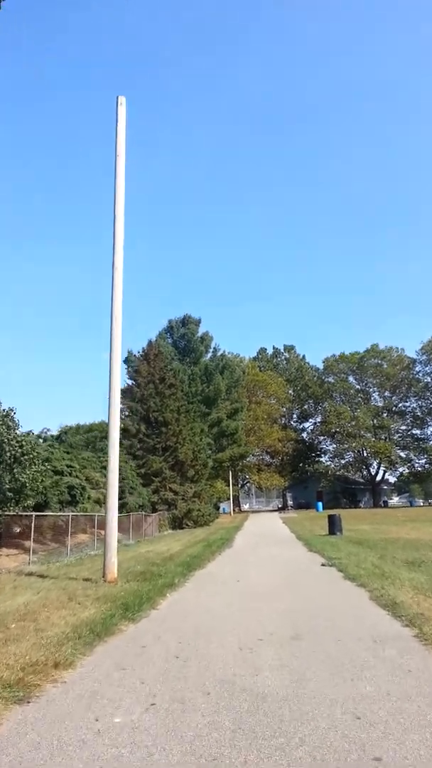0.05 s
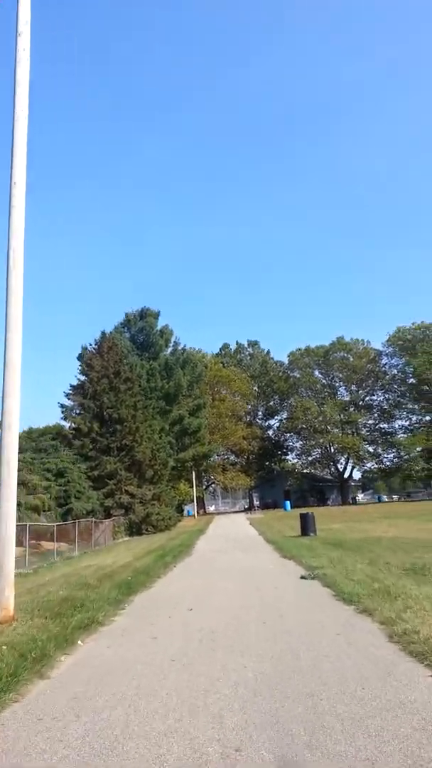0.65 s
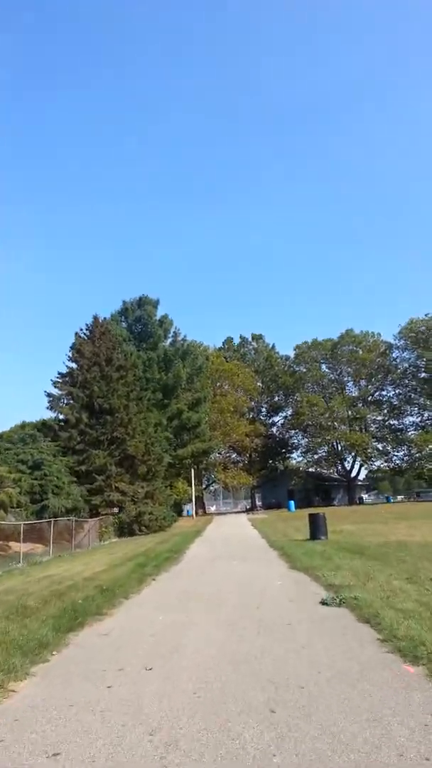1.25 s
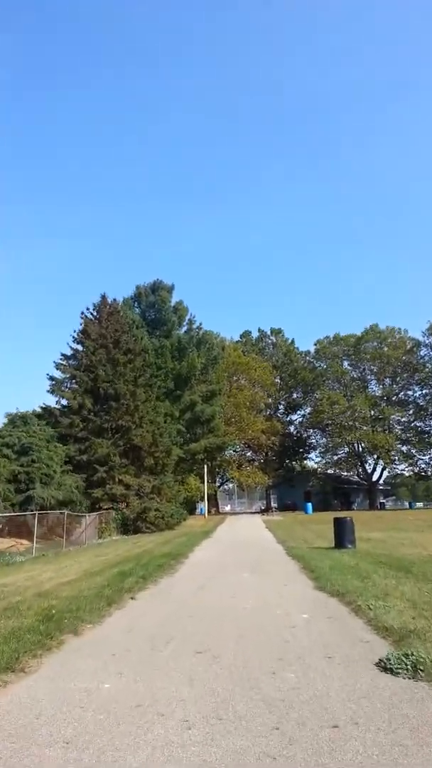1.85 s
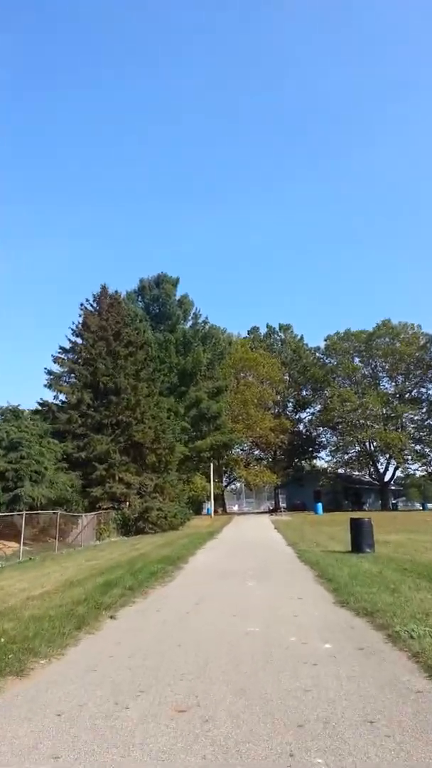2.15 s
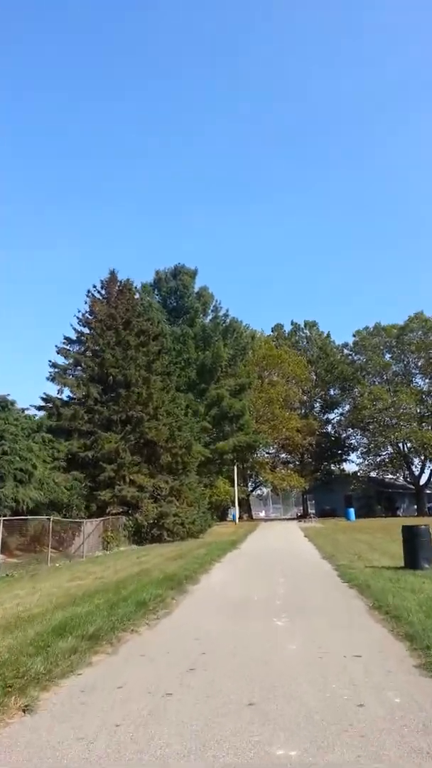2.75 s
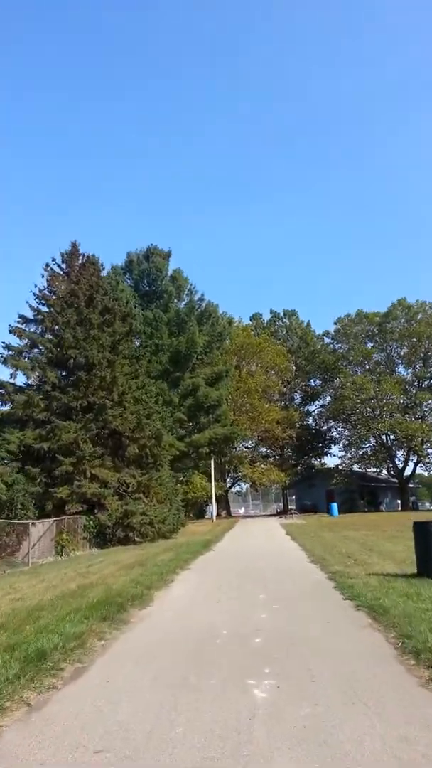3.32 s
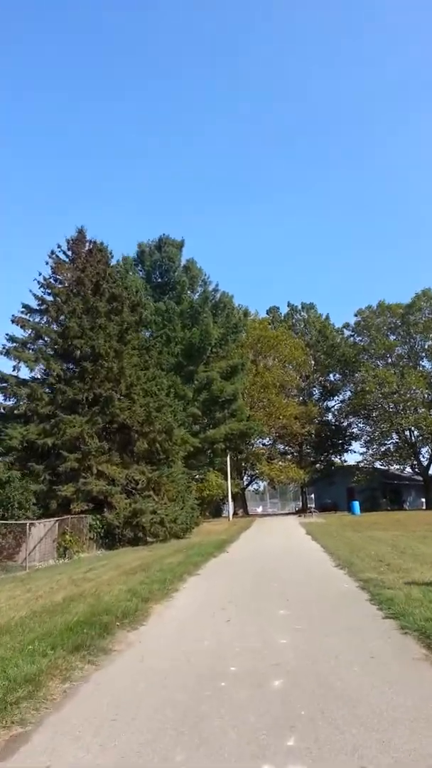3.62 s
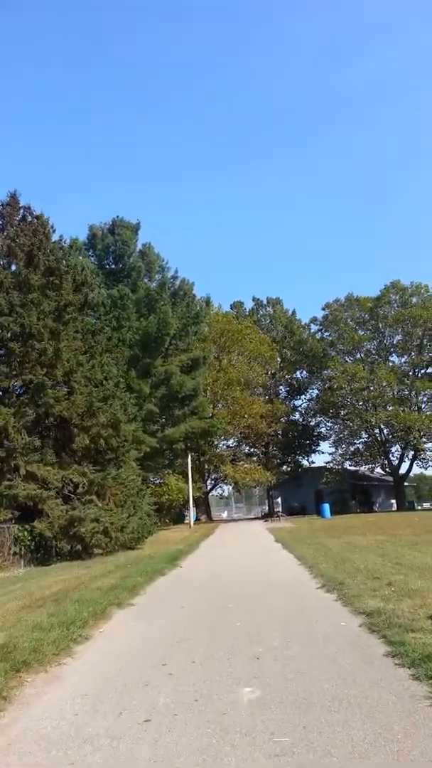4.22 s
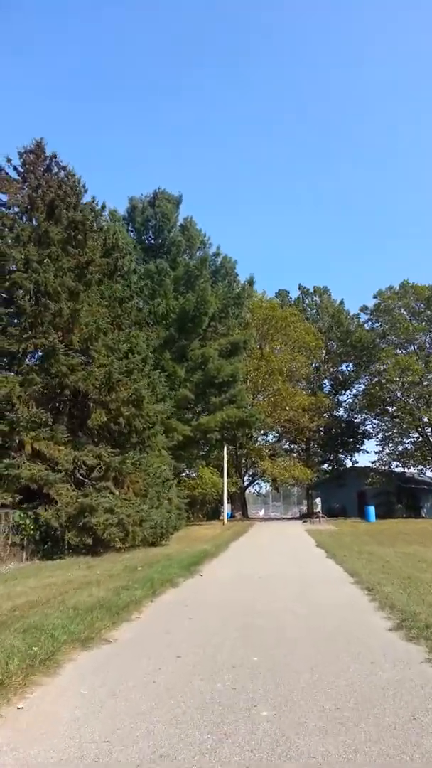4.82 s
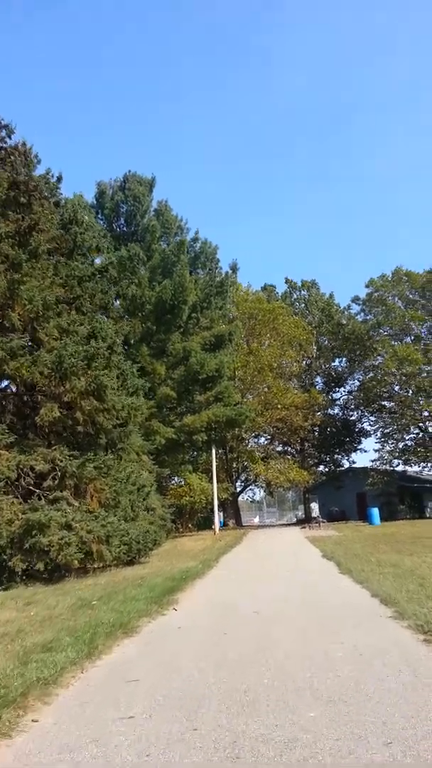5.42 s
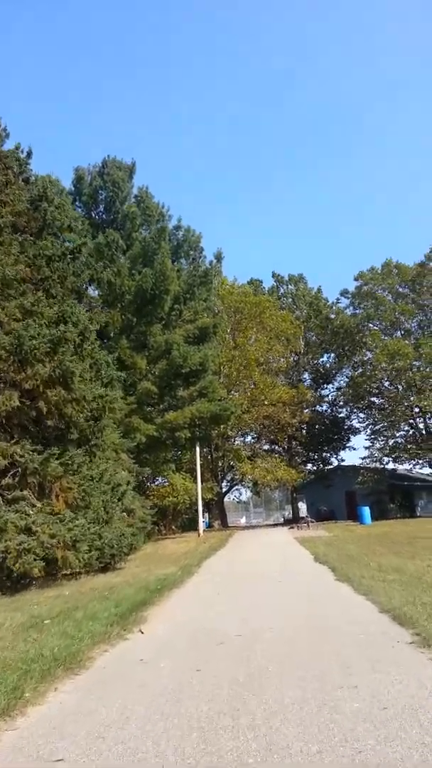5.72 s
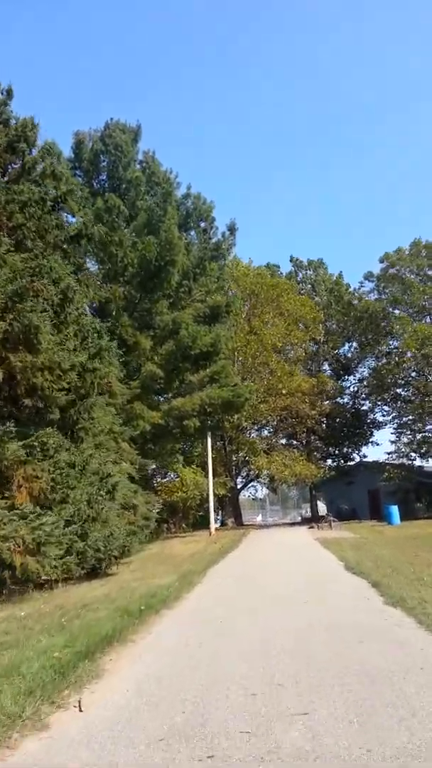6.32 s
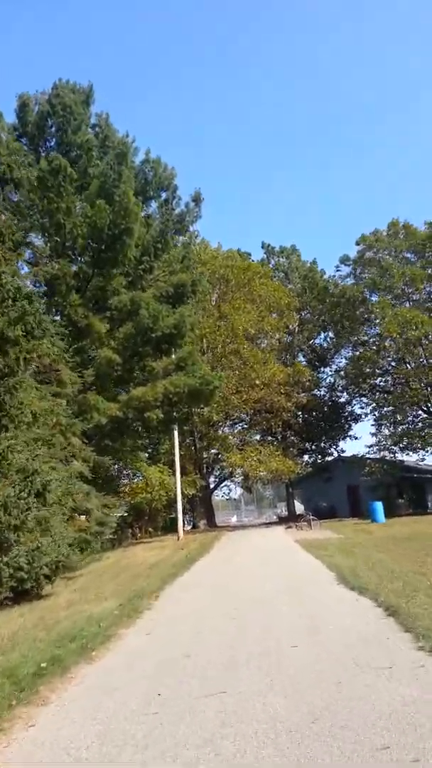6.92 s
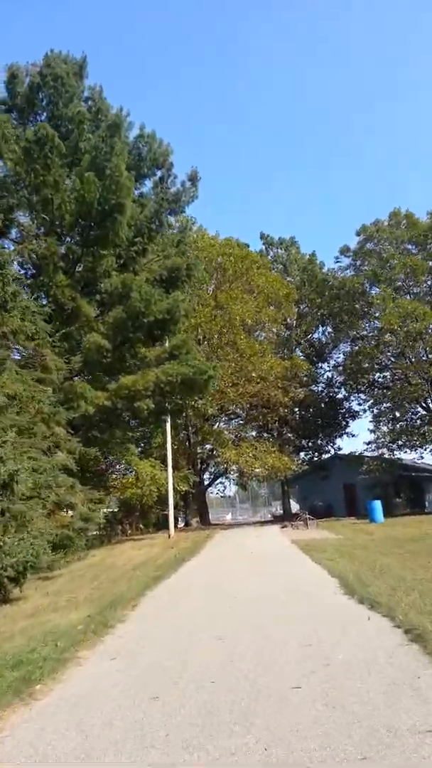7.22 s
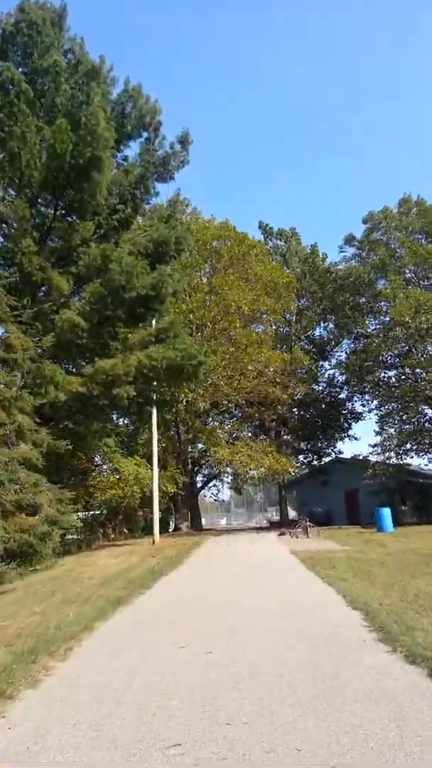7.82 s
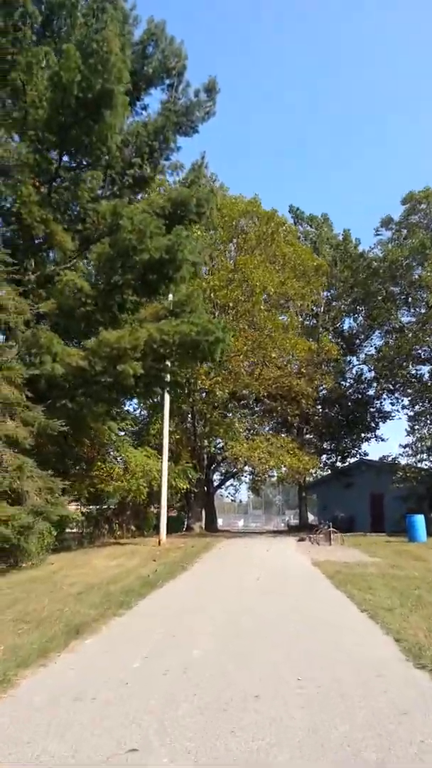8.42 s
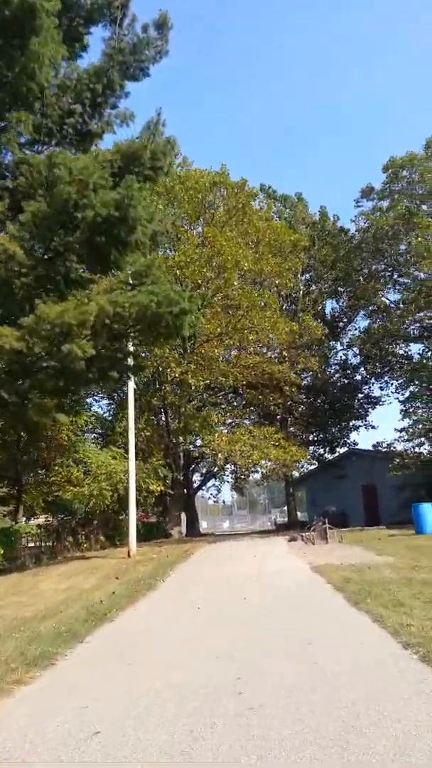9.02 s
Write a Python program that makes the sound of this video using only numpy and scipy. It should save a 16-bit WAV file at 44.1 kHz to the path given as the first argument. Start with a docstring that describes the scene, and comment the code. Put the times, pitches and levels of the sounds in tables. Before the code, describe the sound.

Steady drumming and chatter of a rolling bicycle, with metal ticks, gravel crunches, hard bumps and later gusts of wind on the microphone.

```python
"""On an asphalt path, a bicycle rolls along with a camera fixed to it. The bed is road grain drumming
through the frame, chattering fittings, a wavering tread hum and a fine high crackle; rough patches push
the drum and chatter. The tyres crunch gravel and ping stones away. Bumps knock the mount, loose parts
clack, tick and squeak, and faint insects pass in the grass. Gusts buffet the microphone, mostly in the
second half, and the hardest blows clip."""
import sys
import numpy as np
from scipy import signal
from scipy.fft import rfft, irfft
from scipy.io import wavfile

SR = 44100
rng = np.random.default_rng(int(sys.argv[2]) if len(sys.argv) > 2 else 0)


def put_to_file(sound):
    """Save the sound as 16-bit audio at rate SR, in the file named by the first command-line argument."""
    columns = np.atleast_2d(sound).T  # one column per channel
    safe = np.clip(columns, -1, 1)
    whole_steps = np.round(safe * 32767)
    wavfile.write(sys.argv[1], SR, whole_steps.astype(np.int16))


N = 403956
TIME = np.arange(N) / SR

# the rolling bed: (time [s], frame drumming [dB], chatter [dB])
ROLLING_BED = [(0, -22.5, -35.5), (.81, -23, -37), (1.63, -22, -33.5), (2.17, -21.5, -35),
               (2.52, -21.5, -35), (4.26, -24, -37), (5.84, -22.5, -38.5), (6.15, -23, -38),
               (7.02, -24.5, -38), (8.4, -25, -38), (9.16, -25.5, -37)]
# rough asphalt: (time [s], length [s], extra drumming [dB], extra chatter [dB])
ROUGH_PATCHES = [(0.083, 0.067, 4, 4), (1.069, 0.049, 6.5, 2.5), (1.21, 0.067, 4.5, 2.5),
                 (1.473, 0.2, 3, 1.5), (1.867, 0.055, 2, 1.5), (2.421, 0.074, 7.5, 3.5),
                 (2.675, 0.25, 1.5, 2.5), (3.659, 0.069, 6.5, 4), (4.74, 0.13, 2.5, 3),
                 (5.018, 0.094, 2.5, 6.5), (5.978, 0.12, 5, 5.5), (6.233, 0.082, 2.5, 2.5),
                 (6.5, 0.13, 2.5, 2), (7.35, 0.045, 0, 7), (7.49, 0.092, 5, 4.5), (8.033, 0.057, 2.5, 2),
                 (8.238, 0.094, 4.5, -1), (8.389, 0.11, 5, 2), (8.666, 0.15, 3.5, 1.5)]
# body of the shaken frame: (frequency [Hz], level [dB])
FRAME_EQ = [(20, -61), (45, -32), (68, -15), (115, -33.5), (280, -9), (350, 0), (420, -3), (530, -1),
            (640, -4.5), (710, -8), (800, -19.5), (1000, -21.5), (1300, -27), (2000, -26.5), (5000, -56.5)]
# its resonances: (frequency [Hz], width [Hz], boost [dB])
FRAME_PEAKS = [(413, 9.9, 5.5), (453.7, 61, 10), (588.8, 17.2, 7), (629.6, 31.4, 9), (1004, 69, 4)]
# bark of the tyre casing: (frequency [Hz], level [dB])
CASING_EQ = [(400, -31), (620, -4), (740, 1), (860, -4.5), (1020, -5), (1300, -16), (3000, -47)]
# tone of the chatter: (frequency [Hz], level [dB])
CHATTER_EQ = [(100, -89), (300, 5), (900, 11.5), (1400, 3.5), (1650, 3.5), (2600, 1), (3000, 0.5),
              (4100, -3), (5100, -12.5), (7200, -13.5), (9000, -19.5), (14000, -57), (16000, -63)]
# resonances of the loose parts: (frequency [Hz], width [Hz], boost [dB])
PART_PEAKS = [(1890, 240, 2.5), (3360, 890, 2.5)]
# small pinging fittings: (pitch [Hz], level [dB], t60 [s])
FITTING_MODES = [(1730, -21, 0.023), (2006, -13, 0.015), (2560, -18.5, 0.015), (3120, -20.5, 0.011),
                 (3425, -17, 0.013), (3870, -15.5, 0.0089)]
# the tread's note: (time [s], pitch [Hz], level [dB])
TREAD_NOTE = [(0, 342, -35.5), (.7, 341.4, -37.5), (1.7, 348.5, -27), (2.2, 351.4, -35), (2.6, 348.1, -24),
              (3.2, 347.3, -33), (3.7, 344, -27.5), (4.6, 334.4, -35), (7.2, 336.5, -38),
              (9.16, 344.5, -58)]

# airflow over the microphone: (time [s], level [dB])
BREEZE_LEVEL = [(0, -29.5), (.5, -31.5), (.8, -36.5), (2.7, -34), (4.3, -36), (5.2, -26.5), (5.6, -29.5),
                (6.9, -23.5), (7.3, -33), (7.9, -24), (9.16, -31)]
# gusts on top: (peak time [s], level [dB], fade [s])
GUST_CUES = [(0.11, -22.5, 0.092), (5.965, -19, 0.03), (5.992, -13.5, 0.26), (6.27, -18.5, 0.2),
             (7.1, -23.5, 0.062), (7.65, -21.5, 0.26), (8.07, -19, 0.23), (8.41, -17.5, 0.068),
             (8.7, -20.5, 0.056)]
# rumble of the wind: (frequency [Hz], level [dB])
WIND_EQ = [(20, -54), (38, -38), (60, -11.5), (95, -5.5), (140, -0.5), (210, 1.5), (300, -2.5), (450, -17),
           (800, -20), (3000, -54), (9000, -106)]
# the camera housing, rung by the wind: (frequency [Hz], width [Hz], boost [dB])
HOUSING_PEAKS = [(645, 42, 10)]

# fine, patchy high crackle: (time [s], level [dB])
CRACKLE_LEVEL = [(0, -62), (4.2, -67), (5.8, -69), (6.8, -64), (7.9, -64), (8.65, -58), (9.16, -62)]
# tone of that crackle: (frequency [Hz], level [dB])
CRACKLE_EQ = [(2000, -16), (5000, -1), (8000, -3), (9500, -7), (14000, -3), (15000, -22)]
# stones pinged away: (time [s], peak [dB], pitch [Hz])
PING_CUES = [(.5965, -26, 3400), (.620, -29, 3560), (1.0016, -27, 3360), (1.0832, -23, 3520),
             (2.4795, -20, 3400), (2.4822, -19, 3460), (3.3421, -27, 3310), (3.9489, -34, 3400),
             (3.9709, -24, 3290), (4.1729, -29, 3600), (4.2398, -21, 3360), (4.2815, -27, 3390),
             (7.0155, -32, 3800), (8.6472, -29, 3320), (8.6802, -24, 3040)]
# stones cracking under a tyre: (time [s], peak [dB], pitch [Hz], t60 [s])
CLICK_CUES = [(.150, -22, 3400, .008), (.243, -23, 3700, .008), (.441, -23, 3600, .008),
              (1.2372, -11.5, 3570, 0.0089), (4.149, -22, 1500, .008), (5.6428, -25, 3400, .006),
              (5.7372, -15.5, 3100, 0.0054), (6.0267, -10.5, 1800, .02), (6.0311, -14, 3400, .01),
              (6.359, -23, 3600, .007), (6.5541, -18, 2200, .008), (6.8907, -21, 3600, .007),
              (6.8977, -18, 3200, .008), (7.4895, -26, 3250, .008), (8.4034, -13, 2970, .01)]
# tone of that crack: (frequency [Hz], level [dB])
CLICK_EQ = [(400, -30), (1500, 5), (3800, 5.5), (5500, -7), (8000, -10), (10000, -36), (15000, -38)]
CLICKS_FROM_S = 4.6  # from here the small random stones click instead of pinging

# featured clacks of loose parts: (time [s], peak [dB], length [s], pitch [Hz])
CLACK_CUES = [(0.272, -21.5, 0.0075, 1980), (0.881, -23, .004, 1850), (1.057, -21, 0.0077, 4300),
              (1.077, -21, 0.014, 1860), (1.285, -18, 0.01, 3560), (1.378, -20, 0.0048, 2600),
              (1.547, -19.5, 0.0043, 2370), (1.684, -18.5, 0.011, 2080), (1.761, -22, 0.0045, 2190),
              (1.818, -22, .003, 2200), (1.888, -19, 0.014, 1960), (1.953, -20, 0.016, 2000),
              (2.084, -23, 0.011, 3570), (2.878, -20, 0.013, 1740), (4.416, -26, 0.007, 1890),
              (4.639, -22, 0.0058, 1970), (5.026, -17.5, 0.0039, 2090), (5.117, -19, 0.0019, 1900),
              (5.746, -18.5, 0.0097, 1906), (5.854, -23.5, 0.0052, 1700), (6.032, -16, 0.0084, 1780),
              (6.264, -21.5, 0.013, 1700), (6.551, -20, 0.0053, 2040), (7.108, -25, 0.0055, 1930),
              (7.327, -20, 0.0079, 1710), (7.511, -21.5, 0.014, 2070), (7.589, -20, 0.0057, 1720),
              (7.811, -23, 0.0034, 1870), (8.011, -27, 0.0031, 1970), (8.244, -22, 0.013, 2630),
              (8.319, -22.5, 0.01, 2780), (8.394, -22, 0.006, 3600), (8.616, -19.5, 0.0028, 3360),
              (8.686, -19.5, 0.012, 1920), (8.984, -27, 0.0057, 1780), (9.059, -23, 0.0084, 1950)]
# their tone: (frequency [Hz], level [dB])
CLACK_EQ = [(100, -81), (300, -1), (900, 11), (1400, -2), (1650, 4.5), (2600, 1), (4100, -0.5), (5100, -13),
            (7200, -15), (9000, -27), (14000, -52)]
# gritty scrapes at a wheel: (time [s], level [dB], length [s])
SCRAPE_CUES = [(0.556, -46, 0.028), (1.297, -44, 0.023), (1.965, -35.5, 0.033), (2.595, -46, 0.033),
               (6.763, -43.5, 0.029), (7.462, -44, 0.036)]
# their fizz: (frequency [Hz], level [dB])
SCRAPE_EQ = [(3000, -19), (5500, -4), (6500, -2), (9000, -7), (12500, -6), (13500, -13), (14500, -24)]
# their thin rings: (frequency [Hz], width [Hz], boost [dB])
SCRAPE_PEAKS = [(6220, 330, 11), (9650, 260, 9)]
# dry metal ticks: (time [s], level [dB])
TICK_CUES = [(1.238, -25), (1.255, -12), (1.299, -18), (1.3535, -10.5), (1.389, -17), (1.437, -22),
             (1.486, -8), (1.516, -12), (1.530, -12), (1.549, -26), (1.568, -10), (1.658, -8.5),
             (1.698, -18), (1.711, -24), (1.746, -16.5), (1.786, -21), (1.839, -10.5), (1.897, -21),
             (1.927, -16), (2.099, -24), (2.154, -17), (2.197, -13), (2.317, -27), (2.730, -16),
             (3.038, -20), (3.119, -12), (3.160, -21), (5.104, -20), (5.139, -20), (5.210, -20),
             (5.351, -27), (5.398, -17), (6.8895, -33), (6.898, -27), (7.253, -23)]
# their bright tone: (frequency [Hz], level [dB])
TICK_EQ = [(500, -24), (2000, 1), (5300, -0.5), (6100, -6.5), (7000, 0), (7900, -5), (8500, -9), (9100, -9),
           (9600, 1), (12200, -2.5), (14800, -7), (16000, -20.5)]

# bumps that knock the mount: (time [s], thud [dB], hard contact [dB], thud pitch [Hz])
BUMP_CUES = [(1.240, -6, -34, 408), (1.643, -8, -39, 488), (1.673, 0.5, -13, 395), (1.7478, -6, -21, 350),
             (2.352, -6, -40, 450), (2.436, -15, -39, 471), (2.547, -7.5, -22, 442.6),
             (2.6261, -4, -33, 388), (2.744, -6, -25, 310), (2.908, -9, -21, 450), (4.9205, -13, -27, 430),
             (3.678, -12, -33, 444), (4.747, -7.5, -36, 358), (5.015, -7.5, -32, 460),
             (5.041, -4, -27, 443), (5.1076, 8.5, 1, 482), (5.1811, 0.2, -13.5, 407),
             (7.5126, -7, -17.5, 436), (7.5195, -5.5, -28, 400), (8.6080, 0, -13.5, 390),
             (8.662, -7, -24, 357)]
# the mount's ring around the thud: (pitch [Hz], level [dB], t60 [s])
MOUNT_MODES = [(320, -25, 0.017), (526, -14.5, 0.012), (630, -23, 0.038)]
# crunches of loose gravel: (time [s], peak [dB], length [s])
GRAVEL_CUES = [(1.473, -18, 0.035), (2.267, -21, 0.018), (2.539, -21, .014), (2.673, -20.5, 0.018),
               (3.678, -19, 0.018), (3.277, -24, 0.011), (7.531, -20, 0.034), (7.788, -35, 0.013),
               (7.869, -26.5, 0.027), (7.942, -29, 0.028), (8.043, -23, .025), (8.1, -23, 0.014),
               (8.158, -25, 0.031), (8.401, -13.5, .006), (8.43, -28, 0.018), (8.464, -19, 0.016),
               (8.541, -21, 0.017), (8.749, -24, 0.021), (8.833, -27, .015)]
# insects in the grass: (time [s], length [s], pitch [Hz], bandwidth [Hz], level [dB])
INSECT_CUES = [(2.7, 1.4, 8300, 900, -60), (4.92, .65, 6900, 900, -61)]
# squeaks of frame and fittings: (time [s], length [s], pitch [Hz], glide [Hz/s], level [dB])
SQUEAK_CUES = [(3.782, 0.016, 977, -4, -25), (6.12, 0.043, 3230, -1500, -41),
               (7.21, 0.069, 3160, -1500, -41), (7.462, 0.034, 3300, -1500, -37)]
# the frame's ring after a hard snap: (pitch [Hz], level [dB], t60 [s])
SNAP_RING = [(296, -4, 0.05), (463, 0, 0.033), (607, -8, 0.035), (774, -2, 0.038), (954, -7, 0.031),
             (1150, -3, 0.033), (1260, -2, .02), (1394, 6, 0.037), (1520, -4, .02), (1780, -1, 0.025),
             (2160, -1.5, 0.032), (2436, -1, 0.024), (2820, 0, 0.026), (3020, -4, 0.026), (3490, 2, 0.017),
             (3760, 3.5, 0.023), (4280, 6, 0.0087), (5300, -3, .01), (6240, -3.5, 0.0091)]


def gain(db):
    """Decibels to gain."""
    return 10 ** (np.asarray(db) / 20)


def unit_rms(x):
    """Normalises to rms 1."""
    return x / np.sqrt(np.mean(x ** 2) + 1e-20)


def unit_peak(x):
    """Normalises to peak 1."""
    return x / abs(x).max()


def automation(rows, column=1):
    """One column of a timed table, drawn as a curve over the scene."""
    rows = np.asarray(rows)
    return np.interp(TIME, rows[:, 0], rows[:, column])


def place(mix, at, sound):
    """Drops a sound into the mix at a time in seconds."""
    part = mix[max(round(at * SR), 0):][:len(sound)]
    part += sound[:len(part)]


def eq(points, peaks=(), size=8192):
    """Minimum-phase impulse response of an EQ curve with resonances on top; peak 1."""
    hz = abs(np.fft.fftfreq(size, 1 / SR))
    point_hz, point_db = np.transpose(points)
    db = np.interp(np.log(hz + 1), np.log(point_hz), point_db)
    for centre, width, boost in peaks:
        db = db + boost / (1 + (2 * (hz - centre) / width) ** 2)
    spectrum = np.exp(np.conj(signal.hilbert(np.log(gain(db)))))
    return unit_peak(np.fft.ifft(spectrum).real[:size // 2])


def through(x, impulse):
    """Plays x through an impulse response."""
    return signal.oaconvolve(x, impulse)[:len(x)]


def low_cut(x, hz):
    """Rolls off the bass steeply."""
    return signal.sosfilt(signal.butter(3, hz, "highpass", fs=SR, output="sos"), x)


def wander(rate_hz, size=16384):
    """Smooth random modulation, rms 1."""
    hz = np.fft.rfftfreq(size, N / SR / size)
    slow = irfft(rfft(rng.standard_normal(size)) / (1 + (hz / rate_hz) ** 4))
    return unit_rms(np.interp(TIME, np.linspace(0, N / SR, size), slow))


def swell(at, rise_s, hold_s, fade_s):
    """An envelope that reaches 1 on cue, holds, then dies away."""
    attack = (np.minimum(TIME - at, 0) / rise_s) ** 2
    release = np.maximum(TIME - at - hold_s, 0) / max(fade_s, 1 / SR)
    return np.exp(-attack - release)


def impacts(per_s, spread_db):
    """A random train of tiny hits; more spread makes a few stand out."""
    force = gain(spread_db * np.minimum(rng.exponential(1, N), 4))
    return unit_rms(force * rng.choice([-1, 1], N) * (rng.random(N) < per_s / SR))


def scatter(start, end, per_s, db, hz, spread):
    """Random filler cues: (time [s], level [dB], pitch [Hz])."""
    draws = rng.random((round(per_s * (end - start)), 3))
    return [(start + when * (end - start), db + 3 * (2 * force - 1), hz * (1 + spread * (2 * pitch - 1)))
            for when, force, pitch in draws]


def ring(modes, size=6000):
    """Modes ringing out after one hit; peak 1."""
    t = np.arange(size) / SR
    return unit_peak(sum(gain(db) * np.exp(-np.log(1000) * t / t60) * np.sin(2 * np.pi * hz * t)
                         for hz, db, t60 in modes))


def crunch(decay_s, tone, size=5000):
    """A dying burst of shaped noise; peak 1."""
    t = np.arange(size) / SR
    burst = rng.standard_normal(size) * np.exp(-t / max(decay_s, 1 / SR))
    return unit_peak(through(burst, tone))


def roughness(column):
    """Extra shake in dB while the wheels cross rough patches."""
    return sum(patch[column] * swell(patch[0], rise_s=0.0053, hold_s=patch[1], fade_s=0.037)
               for patch in ROUGH_PATCHES)


def frame_drumming(rough_db, detune=0.015, casing_db=-24.5, casing_growth=1.8):
    """Road grain rings the flexing frame, whose resonances drift; rough patches make the casing bark."""
    road = impacts(per_s=1500, spread_db=1.5)
    flex = np.clip(wander(rate_hz=2.4), -1, 1)
    body = np.zeros(N)
    for side in (-1, 0, 1):  # flex crossfades between flat, centred and sharp tunings
        peaks = [(hz * (1 + side * detune), width, boost) for hz, width, boost in FRAME_PEAKS]
        blend = np.maximum(1 - abs(flex - side), 0)
        body += blend * unit_rms(through(road, eq(FRAME_EQ, peaks)))
    casing = unit_rms(through(impacts(per_s=700, spread_db=1.5), eq(CASING_EQ)))
    bark = gain(casing_db + casing_growth * rough_db) * casing
    return gain(automation(ROLLING_BED)) * (gain(rough_db) * unit_rms(body) + bark)


def chatter(rough_db):
    """Clusters of small contacts and pinging fittings ride on the hiss of the tyres."""
    clusters = unit_rms(through(impacts(per_s=280, spread_db=3), crunch(0.002, [1], size=900)))
    drive = (gain(-4) * clusters + rng.standard_normal(N)) * gain(1.5 * wander(rate_hz=50))
    hiss = unit_rms(through(drive, eq(CHATTER_EQ, PART_PEAKS)))
    pings = np.zeros(N)
    for hz, db, t60 in FITTING_MODES:
        hits = impacts(per_s=70, spread_db=2.8)
        pings += gain(db) * unit_rms(through(hits, ring([(hz, 0, t60)], size=2000)))
    pings *= unit_rms(np.sqrt(gain(automation(TREAD_NOTE, 2))))  # strongest while the tread sings
    pings *= gain(-2.5 + 2.5 * wander(rate_hz=20))
    return gain(automation(ROLLING_BED, 2) + rough_db) * unit_rms(hiss + pings)


def tread_hum(octave_db=-9):
    """The tread sings one rough, wavering note that follows wheel speed, with a raspy octave on top."""
    cycles = np.cumsum(automation(TREAD_NOTE) + 4 * wander(rate_hz=18)) / SR
    flutter = gain(2.4 * wander(rate_hz=10) + 2 * wander(rate_hz=55))
    note = unit_rms(np.sin(2 * np.pi * cycles) * flutter)
    octave = np.sin(2 * np.pi * (2 * cycles + 0.18 * wander(rate_hz=37)))
    rasp = unit_rms(octave * gain(3 * wander(rate_hz=29)))
    return gain(automation(TREAD_NOTE, 2)) * (note + gain(octave_db) * rasp)


def wind(rise_s=0.034):
    """Lumpy eddies of breeze and gusts buffet the microphone, which passes little of the sub-bass."""
    gust_power = sum((gain(db) * swell(at, rise_s, 0, fade)) ** 2 for at, db, fade in GUST_CUES)
    level = np.sqrt(gain(automation(BREEZE_LEVEL)) ** 2 + gust_power)
    eddies = rng.standard_normal(N) * gain(0.92 * wander(rate_hz=22))
    rumble = through(eddies, eq(WIND_EQ, HOUSING_PEAKS))
    return level * unit_rms(low_cut(rumble, hz=50))


def high_crackle():
    """A fine, patchy high crackle comes in uneven flurries."""
    flurries = impacts(per_s=500, spread_db=0) * gain(2.7 * wander(rate_hz=14))
    return gain(automation(CRACKLE_LEVEL)) * unit_rms(through(flurries, eq(CRACKLE_EQ)))


def stone_pings(t60=0.016, rise_s=0.0006, size=2000):
    """Stones slip from under the tread, each with a short, nearly pure ping."""
    out, t = np.zeros(N), np.arange(size) / SR
    attack = 1 - np.exp(-(t / rise_s) ** 2)
    soft = scatter(0, CLICKS_FROM_S, per_s=6, db=-31.5, hz=3510, spread=0.093)
    for at, db, hz in PING_CUES + soft:
        place(out, at, gain(db) * unit_peak(ring([(hz, 0, t60)], size) * attack))
    return out


def stone_clicks(ring_db=-3, soft_t60=0.005, size=2000):
    """Stones crack sharply against the asphalt and ring for an instant."""
    out, tone = np.zeros(N), eq(CLICK_EQ)
    soft = scatter(CLICKS_FROM_S, N / SR, per_s=9, db=-29.5, hz=3300, spread=0.4)
    for at, db, hz, t60 in CLICK_CUES + [(*cue, soft_t60) for cue in soft]:
        crack = crunch(t60 / np.log(1000), tone, size)
        tail = gain(ring_db) * ring([(hz, 0, t60)], size)
        place(out, at, gain(db) * unit_peak(crack + tail))
    return out


def soft_clacks(per_s=2.7, db=-30, spread_db=6, length_s=0.00297):
    """Random filler cues for the clacks, tuned to the resonances of the loose parts."""
    cues = []
    for when, force, length, part in rng.random((round(per_s * N / SR), 4)):
        hz = PART_PEAKS[int(part * len(PART_PEAKS))][0]
        cues.append((when * N / SR, db + spread_db * (2 * force - 1), length_s * (0.5 + length), hz))
    return cues


def clacks(width_hz=400, boost_db=8, size=4000):
    """A loose part buzzes against its seat for a few milliseconds and rings at its own pitch."""
    out, t = np.zeros(N), np.arange(size) / SR
    for at, db, length, hz in CLACK_CUES + soft_clacks():
        age = 2 * t / max(length, 1 / SR)
        burst = rng.standard_normal(size) * age * np.exp(-age)
        tone = eq(CLACK_EQ, [(hz, width_hz, boost_db)] + PART_PEAKS)
        buzz = low_cut(through(burst, tone), hz=1210)
        place(out, at - length / 4, gain(db) * unit_peak(buzz))
    return out


def grit_scrapes():
    """Grit scrapes metal grain by grain, with thin high rings in the fizz."""
    level = sum(gain(db) * np.exp(-(2 * (TIME - at) / length) ** 4) for at, db, length in SCRAPE_CUES)
    grains = impacts(per_s=2500, spread_db=2)
    return level * unit_rms(through(grains, eq(SCRAPE_EQ, SCRAPE_PEAKS)))


def metal_ticks(ring_hz=12200, spread=0.18, bounce_s=0.0048, bounce_db=-10, tail_hiss_db=-30):
    """A loose part ticks at varying pitch and bounces ever faster; a faint, short hiss trails each tick."""
    out = np.zeros(N)
    featured = [(at, db, ring_hz * (1 + spread * rng.uniform(-1, 1))) for at, db in TICK_CUES]
    rattle = scatter(1.22, 2.22, per_s=16, db=-29, hz=ring_hz, spread=spread)
    for at, db, hz in featured + rattle:
        tone = eq(TICK_EQ, [(hz, 1500, 5)])
        fuzz = gain(-16) * crunch(0.002, tone, size=len(tone))
        tick = tone + fuzz
        place(out, at, gain(db) * tick)
        gaps = bounce_s * rng.uniform(0.75, 1.0) * 0.6 ** np.arange(3)
        for bounce, delay in enumerate(np.cumsum(gaps), 1):
            place(out, at + delay, gain(db + bounce * bounce_db + 3.4 * rng.standard_normal()) * tick)
        place(out, at, gain(db + tail_hiss_db) * crunch(0.032, tone))
    return out


def mount_thud(hz, t60=0.018):
    """The hollow knock of a mount too small to give much bass; peak 1."""
    return unit_peak(low_cut(ring([(hz, 0, t60)] + MOUNT_MODES), hz=175))


def mount_knocks(flex_db=-21):
    """Bumps close the play in the mount with a dull crack, then rock it; the frame flexes underneath."""
    out = np.zeros(N)
    crack_tone = eq([(400, -8), (1000, 0), (1400, 13), (1800, 3), (2150, 5), (2800, -6), (3800, 6),
                     (5000, -9), (8000, -23), (14000, -37)])
    for at, thud_db, contact_db, hz in BUMP_CUES:
        place(out, at - 0.0003, gain(contact_db) * crunch(0.0026, crack_tone))
        place(out, at + 0.00032, gain(thud_db) * mount_thud(hz))
        place(out, at, gain(contact_db + flex_db) * ring([(85, 0, 0.036)]))
    return out


def gravel(stones_per_s=600, size=6000):
    """A tyre pinches a few stones and lets them go in a quick, uneven crackle."""
    out, t = np.zeros(N), np.arange(size) / SR
    tone = eq([(500, -21), (1200, -5), (1900, 8), (2600, 3.5), (3700, 7.5), (5000, -11), (7500, -26),
               (10000, -28), (15000, -46)])
    for at, db, length in GRAVEL_CUES:
        stones = rng.standard_normal(size) * (rng.random(size) < stones_per_s / SR)
        stones *= np.exp(-(t / length) ** 2)
        stones[0] = 1  # the first stone lands on cue
        crackle = through(stones, crunch(0.00071, tone, size=600))
        place(out, at, gain(db) * unit_peak(crackle))
    return out


def insects():
    """Thin high trills swell and fade as the bicycle passes."""
    out = np.zeros(N)
    for at, length, hz, width, db in INSECT_CUES:
        trill = unit_rms(wander(rate_hz=width / 2) * np.sin(2 * np.pi * hz * TIME))
        out += gain(db) * np.exp(-(2 * (TIME - at) / length) ** 2) * trill
    return out


def squeaks():
    """Parts rub as the frame flexes and sing hoarsely for a moment."""
    out = np.zeros(N)
    waver = 0.035 * wander(rate_hz=450)
    flutter = unit_rms(gain(4 * wander(rate_hz=180)))
    for at, length, hz, glide, db in SQUEAK_CUES:
        near = abs(TIME - at) < 2 * length
        t = TIME[near] - at
        cycles = np.cumsum(hz * (1 + waver[near]) + glide * t) / SR
        envelope = gain(db) * np.exp(-(2 * t / length) ** 2)
        out[near] += envelope * np.sqrt(2) * np.sin(2 * np.pi * cycles)
    return out * flutter


def frame_snap(at=7.3906, ring_db=7.5, thud_db=1):
    """A loose part cracks hard against the frame, ringing it briefly and rocking the mount."""
    out = np.zeros(N)
    # neighbouring modes swing opposite ways
    clang = sum((-1) ** k * gain(db) * ring([(hz, 0, t60)]) for k, (hz, db, t60) in enumerate(SNAP_RING))
    crack_tone = eq([(300, 1), (800, 1), (1300, 9), (3800, 1), (5500, -2), (9000, -2.5), (12000, -14),
                     (14500, -29)])
    place(out, at, gain(ring_db) * unit_peak(clang))
    place(out, at, crunch(0.0028, crack_tone))
    place(out, at, gain(thud_db) * mount_thud(hz=417))
    return low_cut(out, hz=270)


def scene():
    """The mono mix, heard from on board the bicycle."""
    uneven_db = 0.5 * wander(rate_hz=23)  # even the smooth asphalt varies a little
    rolling = frame_drumming(roughness(2) + uneven_db) + chatter(roughness(3) + uneven_db) + tread_hum()
    bed = rolling + high_crackle()
    stones = grit_scrapes() + gravel() + stone_pings() + stone_clicks()
    loose_parts = mount_knocks() + clacks() + frame_snap() + metal_ticks() + squeaks()
    return (bed + stones + loose_parts + wind() + insects())[None]


def record(dry):
    """The hardest blows clip, then a steep high cut trims the very top."""
    high_cut = signal.firwin(255, 15300, window=("kaiser", 8), fs=SR)
    return signal.oaconvolve(np.clip(dry, -1, 1), high_cut[None], "same")


dry = scene()
out = record(dry)
put_to_file(out)
```